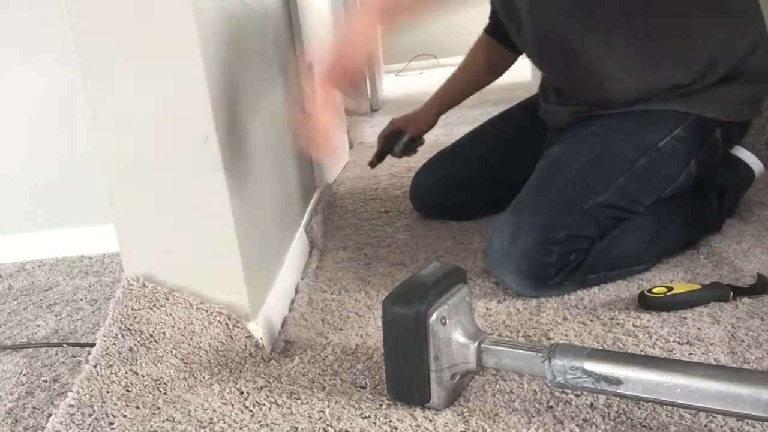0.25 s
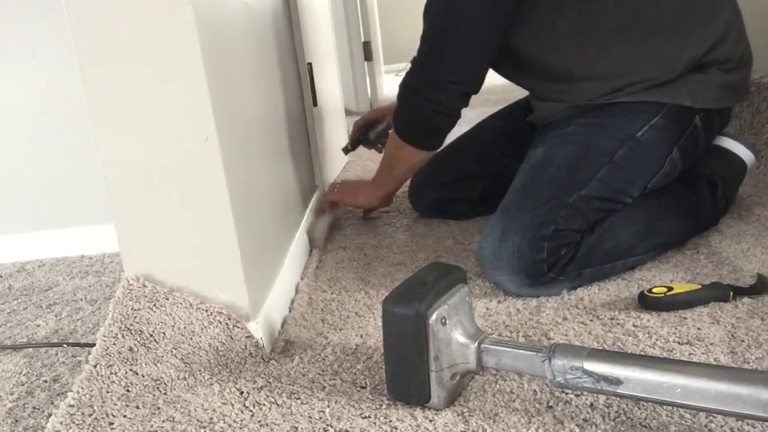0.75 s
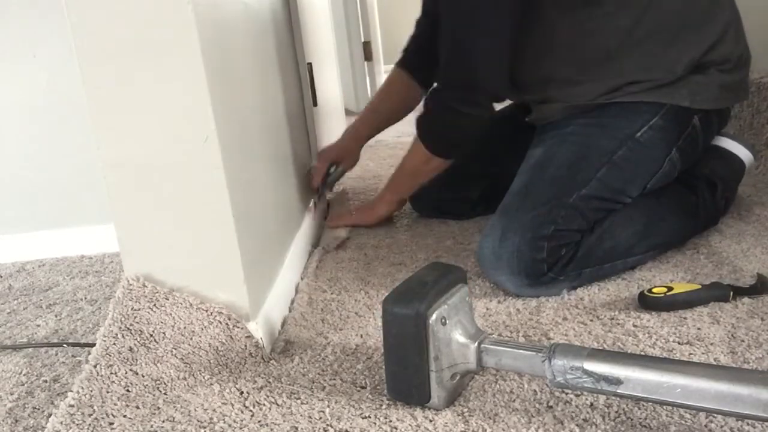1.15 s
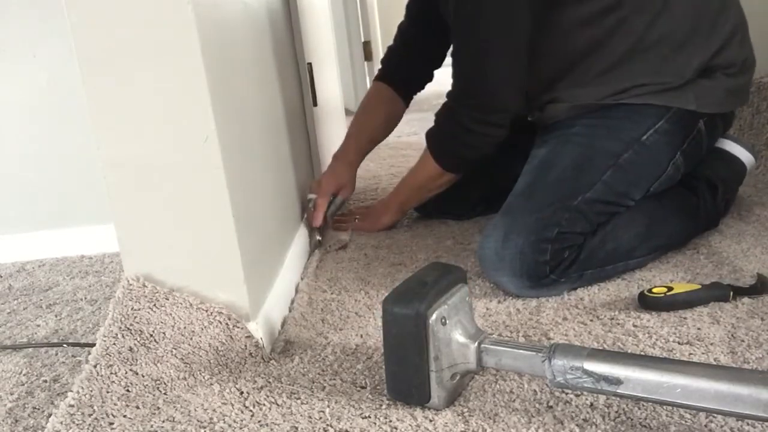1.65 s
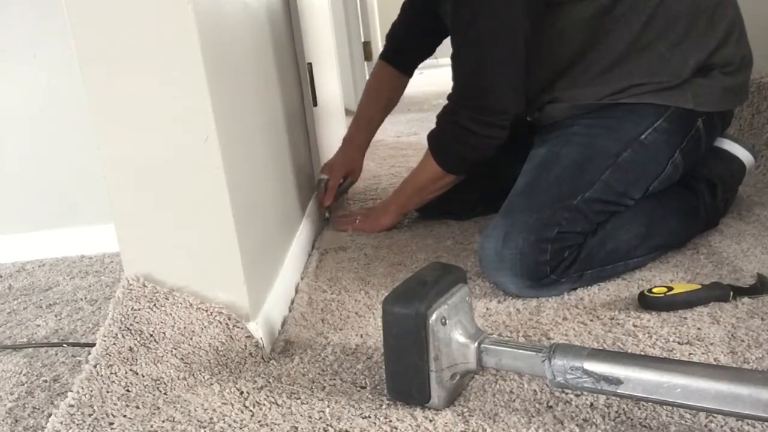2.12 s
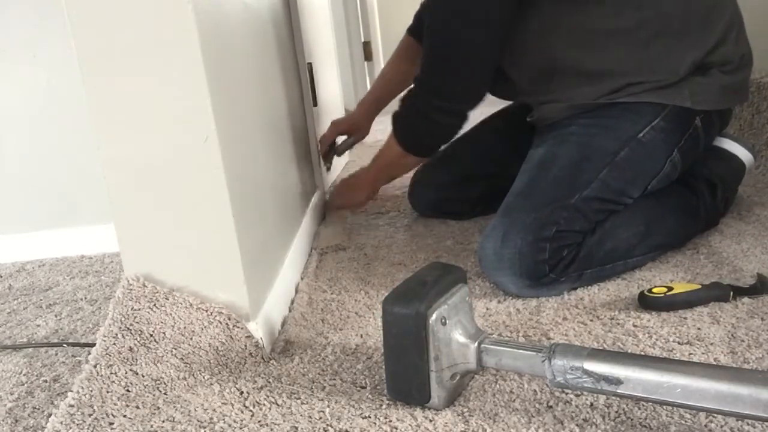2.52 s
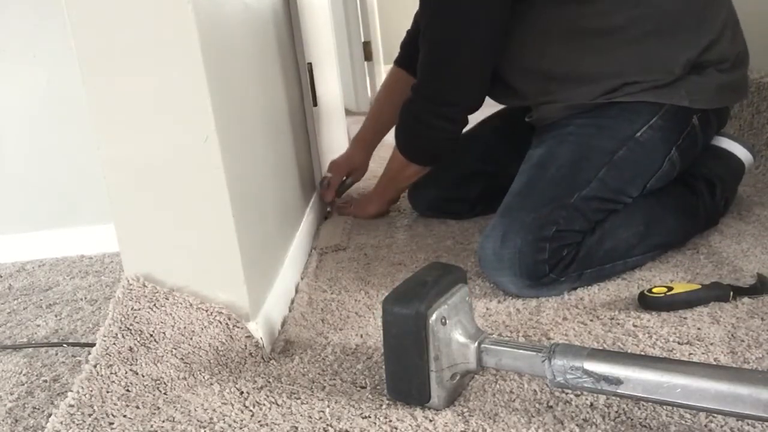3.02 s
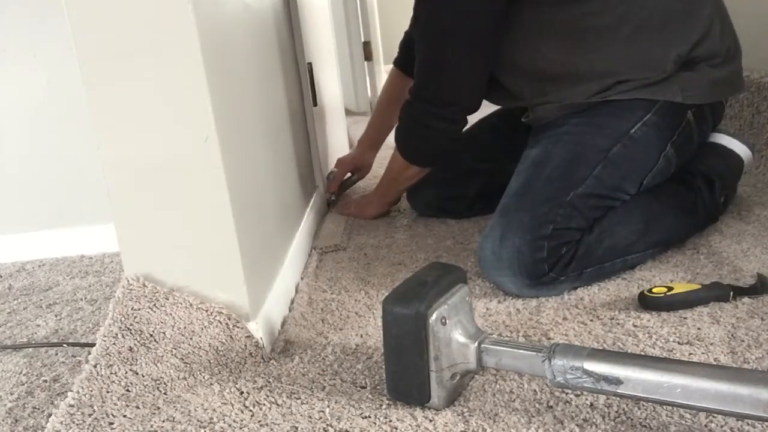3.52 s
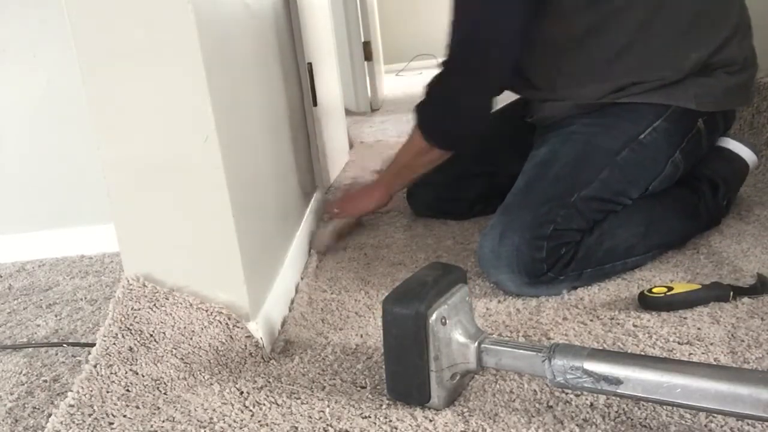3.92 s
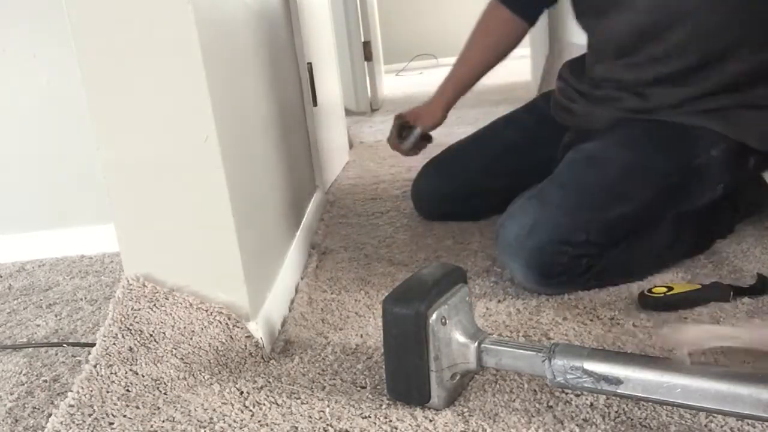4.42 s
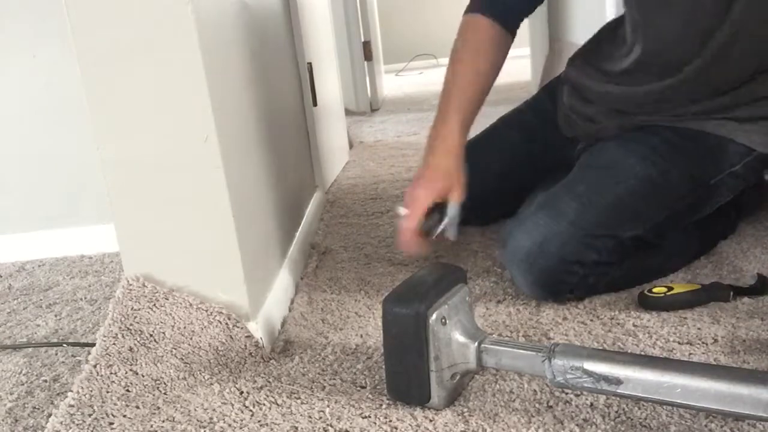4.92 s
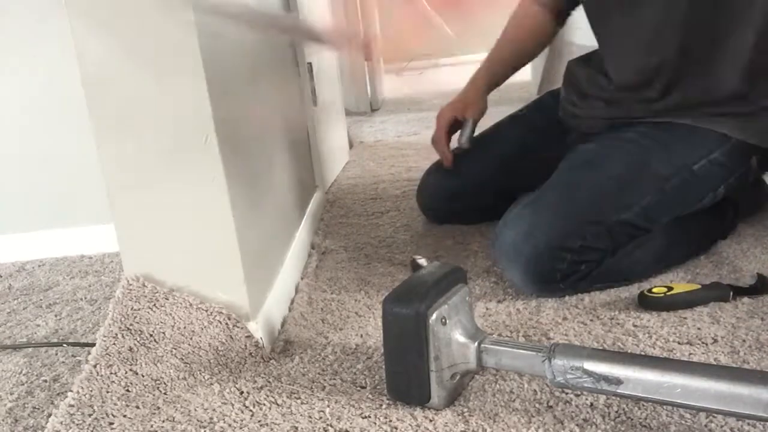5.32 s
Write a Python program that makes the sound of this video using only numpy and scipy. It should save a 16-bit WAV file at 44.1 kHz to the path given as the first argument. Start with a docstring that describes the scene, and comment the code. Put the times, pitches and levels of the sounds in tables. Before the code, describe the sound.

Two harsh, crackling bursts of a blade ripping through stiff carpet backing, amid soft hand rubs, tool ticks and low machine hum indoors.

```python
"""Bare room, carpet along a baseboard: a kneeling worker tucks it in, over a machine humming through the house.
Twice a blade is drawn through the stiff backing: clicks of parting threads, loud snaps, scraped pile, rung board.
Hands and sleeves brush the pile (shaped noise), with squeaks and thin swishes (narrow wavering bands).
The tool ticks on the trim, hands thump the floor, a small hard piece drops and bounces (struck resonances).
The machine is wavering tones, rumble and hiss; the room is a short noise tail."""
import sys
import numpy as np
from scipy import signal
from scipy.fft import rfft, irfft, next_fast_len
from scipy.io import wavfile
from scipy.ndimage import uniform_filter1d, map_coordinates

SR = 44100
rng = np.random.default_rng(int(sys.argv[2]) if len(sys.argv) > 2 else 0)


def int16_out(signal):
    """Quantize to a 16-bit WAV file."""
    q = np.round(np.clip(np.atleast_2d(signal).T, -1, 1) * 32767)
    wavfile.write(sys.argv[1], SR, q.astype(np.int16))


N = 244752

# blade catches and jerks free: time_s, size_db
SNAPS = [(1.936, -15), (1.947, -10), (1.979, -13), (2.058, -10), (2.126, -9), (2.152, -10.5), (2.1906, -6),
         (2.1973, -6), (2.263, -11.5), (2.2752, -19), (2.2853, -23), (3.141, -30), (3.1506, -8),
         (3.163, -11), (3.201, -12.5), (3.233, -11), (3.3039, -12.5), (3.344, -17), (3.3584, -12),
         (3.3733, -9.5), (3.376, -14), (3.395, -30), (3.4044, -11), (3.414, -16), (3.4213, -11),
         (3.489, -15), (3.516, -15.5), (3.549, -11.5), (3.562, -10), (3.5677, -14.5), (3.5798, -11.5),
         (3.594, -8), (3.604, -7.5), (3.6124, -15), (3.636, -15), (3.6883, -12), (3.6946, -7.5),
         (3.732, -21)]
# hiss of fibres, also the tool's edge: freq_hz, gain_db
FIBRES = [(2500, -2), (5000, 0), (6800, 1.5), (9500, -4), (12500, -2), (16000, -11)]


def amp(db):
    """Decibels to amplitude."""
    return 10 ** (np.asarray(db) / 20)


def unit(x):
    """Scale to rms 1."""
    return x / np.sqrt(np.mean(x ** 2) + 1e-20)


def along(points, hz):
    """Interpolate (Hz, value) points on a log frequency axis."""
    f, v = np.transpose(points)
    return np.interp(np.log(hz + 1), np.log(f + 1), v)


def curves(rows):
    """One value per sample for each column after the time; -140 outside the rows."""
    s, *cols = np.transpose(rows)
    t = np.arange(N) / SR
    return [np.interp(t, s, c, left=-140, right=-140) for c in cols]


def wobble(rate, size=N):
    """Smooth random curve, rate knots per second."""
    knots = rng.standard_normal(int(size * rate / SR) + 4)
    return map_coordinates(knots, [np.arange(size) * rate / SR])


def gains(points, hz):
    """Gain of a (Hz, dB) spectrum that falls steeply beyond its ends."""
    below = np.minimum(1, (hz + 1) / points[0][0])
    above = np.minimum(1, points[-1][0] / (hz + 1))
    return amp(along(points, hz)) * (below * above) ** 4


def tilted(points, db_per_octave):
    """The same spectrum, brighter or duller."""
    return [(hz, db + db_per_octave * np.log2(hz / points[0][0])) for hz, db in points]


def noise(points):
    """Coloured noise of rms 1."""
    m = next_fast_len(N)
    white = rfft(rng.standard_normal(m))
    return unit(irfft(white * gains(points, np.fft.rfftfreq(m, 1 / SR)), m)[:N])


def pulse(points, size=2048):
    """Minimum-phase click with this spectrum, of energy 1."""
    cepstrum = irfft(np.log(gains(points, np.fft.rfftfreq(size, 1 / SR)) + 1e-5))
    cepstrum[1:size // 2] *= 2
    cepstrum[size // 2 + 1:] = 0
    h = irfft(np.exp(rfft(cepstrum)))
    return h / np.linalg.norm(h)


def body(modes, size=8192):
    """Impulse response of (Hz, width Hz, dB) resonances in alternating sign, of energy 1."""
    f = np.fft.rfftfreq(size, 1 / SR)
    response = 0
    for k, (centre, width, db) in enumerate(modes):
        damping = 1j * f * width
        response = response + (-1) ** k * amp(db) * damping / (centre ** 2 - f * f + damping)
    h = irfft(response)
    return h / np.linalg.norm(h)


def through(x, h):
    """Filter x by impulse response h."""
    return signal.fftconvolve(x, h)[:N]


def add(track, s, sound):
    """Mix a sound into a track at time s."""
    part = track[round(s * SR):][:len(sound)]
    part += sound[:len(part)]


def burst(t60, rise=0.00027):
    """Noise that swells at once (rise, s) and falls 60 dB in t60 s."""
    t = np.arange(SR // 8) / SR
    return amp(-60 * t / t60) * (1 - np.exp(-t / rise)) * rng.standard_normal(len(t))


def patchy(x, depth_db, size=256):
    """The colour of a sound shifts at random from moment to moment."""
    z = signal.stft(x, nperseg=size)[2]
    field = uniform_filter1d(rng.standard_normal(z.shape), size=4, axis=0)
    field = uniform_filter1d(field, size=8, axis=1)
    return signal.istft(z * amp(depth_db * unit(field)), nperseg=size)[1][:N]


def machine():
    """A motor's wavering hum, the lumpy rumble of moving air and a thin hiss."""
    # motor tones: freq_hz, level_db
    hum_tones = [(122.5, -50.5), (393, -72.5)]
    # moving air: freq_hz, gain_db
    rumble_colour = [(20, -45), (33, -28), (45, -15), (60, -11), (78, 3), (93, 4.5), (108, -1.5),
                     (122, 1.5), (138, 4.5), (165, -8.5), (195, -6.5), (270, -10), (295, -12.5),
                     (345, -9.5), (395, -12), (420, -19.5), (470, -14), (525, -24), (680, -47.5)]
    # thin hiss: freq_hz, gain_db
    air_colour = [(350, -34), (620, -6), (770, -3.5), (900, -7.5), (1010, -3.5), (1720, -13), (2290, -12),
                  (2820, -17.5), (3410, -13.5), (3700, -18), (5900, -18.5), (11400, -25.5), (15800, -26.5)]
    t = np.arange(N) / SR
    hum = np.zeros(N)
    for hz, db in hum_tones:
        level = amp(db + 4.66 * wobble(14)) * np.sqrt(2)
        hum += level * np.sin(2 * np.pi * hz * t + 0.62 * wobble(9))
    lumps = unit(patchy(noise(rumble_colour), depth_db=1.5, size=1024))
    rumble = amp(-44.5 + 1.27 * wobble(10)) * lumps
    return hum + rumble + amp(-67.5) * noise(air_colour)


def thumps():
    """The hand lands on the padded floor with a short low thud."""
    # landings: time_s, level_db
    landings = [(0.051, -34.5), (0.075, -47), (1.852, -39)]
    # thud spectrum: freq_hz, gain_db
    thud_colour = [(120, -3.5), (300, 4.5), (550, -28), (850, -4), (1200, -47), (2500, -21)]
    blows = np.zeros(N)
    for s, db in landings:
        add(blows, s, amp(db) * burst(0.032, rise=0.00088))
    return through(blows, pulse(thud_colour))


def ticks():
    """Each contact knocks the trim, rings the tool and clicks on its edge."""
    # tool contacts: time_s, level_db, hardness_db (more edge, less knock)
    contacts = [(0.054, -56.5, -3), (0.091, -54.5, 7.5), (0.139, -65, 9), (0.883, -55.5, -2.5),
                (0.922, -61.5, 2), (1.045, -51.5, -6), (1.051, -56, 1), (1.854, -43, 2.5),
                (2.835, -73.5, 12.5), (3.026, -71, 12), (3.039, -74, 16), (3.057, -66.5, 13),
                (3.095, -65.5, 10), (4.017, -61, -2), (4.094, -52, -2), (4.105, -39.5, 4),
                (4.117, -39, 0.5), (4.123, -44.5, 6), (4.424, -54.5, 4.5)]
    # tool resonances: freq_hz, width_hz, gain_db
    tool_modes = [(685, 42, -7), (1360, 84, -2.5), (1860, 260, 5), (3020, 660, 2), (3230, 115, 6.5),
                  (3670, 410, -5.5), (4470, 49, 3.5), (5600, 520, -7)]
    knock, click, edge = np.zeros((3, N))
    for s, db, hard_db in contacts:
        add(knock, s, amp(db - hard_db + 0.5) * burst(0.046))
        add(click, s, amp([db + 16.5]))  # one-sample blow
        add(click, s, amp(db + 4.5) * burst(0.029))
        add(edge, s, amp(db + hard_db + 8) * burst(0.011, rise=0.00096))
    trim = pulse([(450, -2.5), (800, 1.0), (1300, 4.0), (2100, -0.5), (2700, -9)])
    return through(knock, trim) + through(click, body(tool_modes)) + through(edge, pulse(FIBRES))


def sweep(length_s):
    """Loudness of one sweep: an arch that follows the speed of the hand."""
    peak_share, power = 0.42, 1.88
    u = np.interp(np.linspace(0, 1, round(length_s * SR)), [0, peak_share, 1], [0, .5, 1])
    return np.abs(np.sin(np.pi * u)) ** power


def brushing():
    """Skin and cloth slide unevenly over pile: a soft rub that brightens with speed, a grainy fibre hiss."""
    # hand or sleeve over the pile: start_s, length_s, rub_db, rub_centre_hz, hiss_db
    sweeps = [(0.056, 0.052, -53.5, 1720, -55.5), (0.657, 0.057, -65.5, 1500, -62),
              (0.868, 0.12, -72, 1600, -64), (1.0, 0.19, -59.5, 1740, -74), (1.091, 0.26, -61.5, 1610, -77),
              (1.241, 0.11, -78, 1700, -51.5), (1.335, 0.082, -72, 1900, -52.5),
              (1.643, 0.062, -62, 1610, -63), (2.377, 0.3, -53.5, 1880, -46.5),
              (2.639, 0.085, -77, 1490, -60.5), (2.672, 0.078, -62, 1300, -71),
              (2.995, 0.32, -74, 1300, -63), (3.828, 0.11, -53, 1870, -49), (3.875, 0.14, -53.5, 1340, -54),
              (3.955, 0.21, -58, 1330, -63.5), (4.29, 0.089, -63, 2070, -67),
              (4.339, 0.11, -65.5, 2500, -71), (4.511, 0.056, -59, 1410, -65),
              (4.566, 0.23, -60.5, 855, -73), (4.717, 0.044, -62, 2840, -82),
              (4.722, 0.16, -65.5, 1220, -70), (5.109, 0.13, -62, 1420, -60),
              (5.292, 0.061, -60, 2210, -59)]
    # rub spectrum, before shifting to each sweep's centre: freq_hz, gain_db
    rub_colour = [(400, -39.5), (800, 4.5), (1600, 8.5), (2400, 2.5), (3600, 0), (5500, -10), (10000, -24)]
    table_centre_hz, slow_duller_octaves = 1600, 0.25
    rub, hiss = np.zeros((2, N))
    for s, length_s, rub_db, centre_hz, hiss_db in sweeps:
        arch = sweep(length_s)
        # crossfade from the duller slow colour to the fast one
        for share, octaves in ((1 - arch, -slow_duller_octaves), (arch, 0)):
            shift = centre_hz / table_centre_hz * 2 ** octaves
            colour = pulse([(hz * shift, db) for hz, db in rub_colour])
            friction = arch * np.sqrt(share) * rng.standard_normal(len(arch))
            add(rub, s, amp(rub_db) * signal.fftconvolve(friction, colour))
        add(hiss, s, amp(hiss_db) * arch)
    grain = unit(amp(1.1 * wobble(700) + 1.2 * wobble(60)))
    rubbing = amp(-2) * patchy(rub, depth_db=4)
    hissing = amp(-5.5) * hiss * noise(FIBRES)
    return grain * (rubbing + hissing)


def squeaks_and_swishes():
    """Squeaks and thin swishes: hoarse narrow noise bands or wavering tones that swell and fade."""
    # squeaks and swishes: start_s, length_s, pitch_hz, glide_octaves, level_db, width_share_of_pitch
    bands = [(0.068, 0.032, 1460, 0.094, -61, 0.12), (0.077, 0.019, 5580, 0.17, -53, 0.2),
             (1.26, 0.079, 14000, 0, -56, 0.39), (1.332, 0.053, 7500, -0.033, -61, 0.25),
             (2.176, 0.021, 4170, 0.042, -33, 0.12), (2.356, 0.014, 1199, 0.062, -55, 0.18),
             (2.64, 0.05, 14200, 0, -63, 0.33), (3.189, 0.14, 4630, -0.39, -46.5, 0.13),
             (4.305, 0.0435, 2370, -0.195, -59, 0.32), (4.416, 0.038, 7820, 0.032, -59.5, 0.11),
             (5.189, 0.012, 2990, -0.016, -59, 0.14), (5.309, 0.016, 3900, -0.04, -60, 0.098),
             (5.369, 0.18, 3410, 0, -72.5, 0.031)]
    out = np.zeros(N)
    for s, length_s, hz, glide, db, width in bands:
        u = np.linspace(0, 1, round(length_s * SR))
        phase = 2 * np.pi * np.cumsum(hz * 2 ** (glide * u)) / SR
        a, b = (wobble(width * hz, size=len(u)) for _ in range(2))
        band = a * np.cos(phase) + b * np.sin(phase)
        add(out, s, amp(db) * np.sin(np.pi * u) * band)
    return out


def leaning():
    """Shifting weight excites the floor's low resonances with noise."""
    # weight on the floor: time_s, level_db
    weight = [(1.72, -76), (1.8, -43), (1.87, -38.5), (1.93, -44.5), (2.2, -57), (2.32, -67)]
    # floor resonances: freq_hz, width_hz, gain_db
    floor_modes = [(45.3, 18, -14), (100.5, 40.6, -1), (147, 50, -3.5), (183.4, 14.7, -0.5)]
    return through(amp(curves(weight)[0]) * rng.standard_normal(N), body(floor_modes))


def threads(times, sizes, size=256):
    """Each thread parts with a sharp noise crack; its fibres fray for a millisecond after it."""
    crack_rise_s, crack_s, fray_share, fray_s = 0.0002, 0.00028, 0.25, 0.001
    t = np.arange(size) / SR
    dying = np.exp(-t / crack_s) + fray_share * np.exp(-t / fray_s)
    envelope = (1 - np.exp(-t / crack_rise_s)) * dying
    shapes = envelope * rng.standard_normal((len(times), size))
    shapes *= (sizes / np.linalg.norm(shapes, axis=1))[:, None]
    at = np.round(np.asarray(times) * SR).astype(int)[:, None] + np.arange(size)
    return np.bincount(at.ravel(), shapes.ravel(), N + size)[:N]


def stroke(rows, colour, crack_db, fibre_db, scrape_db):
    """The blade cuts woven threads in turn; loose fibres crackle between them, its side scrapes the pile."""
    weave_uneven, thread_spread_db = 0.27, 7  # log scatter of spacing, range of strength
    catch_s, fibres_per_s = 0.004, 1100  # no other thread parts this close to a snap
    level_db, threads_per_s = curves(rows)
    crossed = np.cumsum(np.maximum(threads_per_s, 0)) / SR
    steps = np.cumsum(np.exp(weave_uneven * rng.standard_normal(300)))
    at = np.searchsorted(crossed, steps[steps < crossed[-1]])
    to_snap_s = np.abs(at[:, None] / SR - np.array(SNAPS)[:, 0]).min(axis=1)
    at = at[to_snap_s > catch_s]
    sizes = amp(level_db[at] + crack_db - thread_spread_db * rng.random(len(at)))
    cracks = through(threads(at / SR, sizes), pulse(tilted(colour, db_per_octave=.4)))
    rasp = patchy(cracks, depth_db=2.5, size=512)
    loose = rng.standard_normal(N) * (rng.random(N) < fibres_per_s / SR)
    crackle = through(unit(loose), pulse(tilted(colour, db_per_octave=-1.2)))
    scrape = patchy(noise(tilted(colour, db_per_octave=-1.0)), depth_db=3)
    pile = unit(scrape * amp(2.1 * wobble(500)))
    return rasp + amp(level_db + fibre_db) * crackle + amp(level_db + scrape_db) * pile


def snaps():
    """Tough threads hold the blade and then snap loudly."""
    # snap spectrum: freq_hz, gain_db
    snap_colour = [(300, -8), (650, -8), (1000, -1), (2300, 0), (4400, -1), (4950, -4), (5600, 0),
                   (7000, -1), (8600, -4), (9800, 0), (10500, -6), (12500, -2), (16000, -5)]
    s, size_db = np.transpose(SNAPS)
    return through(threads(s, amp(size_db)), pulse(snap_colour))


def lower_board(fast_push, slow_push):
    """The push of the blade rings the baseboard's low resonances, more in the fast stroke."""
    # low baseboard resonances: freq_hz, width_hz, gain_db
    lower_board_modes = [(188, 31, -4), (340.3, 10.4, 1), (410.4, 15.6, 1.5), (524, 25, -2.5),
                         (700, 230, -12.5)]
    push = amp(-13.0) * fast_push + amp(-19.0) * slow_push
    return through(push * rng.standard_normal(N), body(lower_board_modes))


def upper_board(fast_push, slow_push):
    """The baseboard's resonances near 1 kHz ring, weighted towards the slow stroke."""
    # baseboard resonances near 1 kHz: freq_hz, width_hz, gain_db
    upper_board_modes = [(927, 49, 0.5), (1022, 92, -0.5)]
    push = amp(-19.5) * fast_push + amp(-11.5) * slow_push
    return through(push * rng.standard_normal(N), body(upper_board_modes))


def tucking():
    """Two strokes and their snaps, with the baseboard and floor they sound."""
    # blade strokes: time_s, level_db, threads_per_s
    fast_rows = [(1.866, -48.5, 40.5), (1.924, -46.5, 90.5), (1.95, -36.5, 149.5), (2.02, -33, 199.5),
                 (2.06, -32, 215), (2.178, -32, 215), (2.19, -31, 240), (2.236, -32.5, 220.5),
                 (2.26, -47.5, 86.5), (2.29, -46, 9), (2.33, -62, 0.5)]
    slow_rows = [(3.13, -60, 0), (3.15, -35.5, 139.5), (3.186, -39, 160.5), (3.2, -36, 190),
                 (3.24, -35, 190), (3.278, -42.5, 130.5), (3.316, -37, 134.5), (3.44, -43.5, 100),
                 (3.49, -39, 125.5), (3.53, -48, 99.5), (3.556, -36, 150.5), (3.6, -41, 110.5),
                 (3.648, -49, 109), (3.692, -30, 159), (3.71, -44.5, 69), (3.745, -49, 10),
                 (3.79, -56, 0.5)]
    # crackle spectra: freq_hz, gain_db
    fast_colour = [(250, -18), (400, -17), (720, -14.5), (950, -4), (1400, -7.5), (1900, -5), (3100, -4),
                   (3900, -6.5), (4350, -2.5), (4950, -9), (5500, -2.5), (6100, -5), (7200, -5),
                   (8600, -12), (9900, -4.5), (10400, -11), (12800, -9), (15800, -13)]
    slow_colour = [(290, -22), (550, -15), (780, -4), (1020, 1), (1400, -1.5), (2200, 0.5), (3300, -0.5),
                   (4400, -2), (4950, -7), (5500, -4), (6500, -1.5), (7300, -6), (8600, -7), (9700, -1.5),
                   (10500, -11), (12100, -5.5), (15800, -10)]
    fast = stroke(fast_rows, fast_colour, crack_db=24, fibre_db=-8, scrape_db=-9)
    slow = stroke(slow_rows, slow_colour, crack_db=26, fibre_db=-8, scrape_db=-9)
    pushes = amp(curves(fast_rows)[0]), amp(curves(slow_rows)[0])
    return fast + slow + snaps() + lower_board(*pushes) + upper_board(*pushes) + leaning()


def dropped_piece():
    """A short dull landing, then quick ringing, scuffing bounces; long contacts ring only low modes."""
    # bounces: time_s, ring_db, thud_db, contact_ms
    bounces = [(5.061, -56, -40, 0.75), (5.069, -37, -60, 0.079), (5.079, -32, -38.5, 0.6),
               (5.088, -35.5, -46, 0.12), (5.102, -36.5, -60, 0.17), (5.119, -42, -54, 0.75),
               (5.14, -51, -60, 0.5), (5.157, -57, -60, 0.2), (5.254, -54, -57, 0.25)]
    # resonances of the piece: freq_hz, width_hz, gain_db
    piece_modes = [(1188, 45, 5.5), (1293, 28, 7), (1398, 44, 1.5), (1640, 160, -9), (2060, 370, -11),
                   (2750, 160, -5), (2970, 88, -2), (3200, 160, -8.5), (3870, 130, -10.5),
                   (6000, 3300, -25)]
    clank, thud = np.zeros((2, N))
    for s, ring_db, thud_db, contact_ms in bounces:
        press = np.hanning(3 + round(contact_ms * SR / 1000))
        strike = amp(ring_db) * burst(0.054, rise=0.0002)  # scuff
        strike[0] += amp(ring_db + 21)  # blow
        add(clank, s, np.convolve(strike, press / press.sum()))
        add(thud, s, amp([thud_db + 20]))
        add(thud, s, amp(thud_db + 6) * burst(0.03))
    floor = pulse([(130, 6), (240, 9.5), (450, 2), (850, -5), (1100, -1)])
    return through(clank, body(piece_modes)) + through(thud, floor)


def room(x):
    """Bare walls answer after 3 ms with a noise tail whose decay depends on frequency."""
    # decay: freq_hz, t60_s
    decay = [(150, 0.14), (500, 0.024), (1300, 0.31), (3500, 0.32), (9000, 0.1), (15000, 0.12)]
    hz, t, z = signal.stft(rng.standard_normal(SR // 2), SR, nperseg=256)
    fading = amp(-60 * t / along(decay, hz)[:, None])
    tail = signal.istft(z * fading, SR, nperseg=256)[1]
    return through(x, np.pad(tail / np.linalg.norm(tail), (round(.003 * SR), 0)))


def scene():
    """Mix the sources with their room answers; the machine stays dry."""
    taps, hands = ticks() + thumps(), brushing()
    carpet, drop = tucking() + squeaks_and_swishes(), dropped_piece()
    wet = room(amp(-10.0) * carpet + amp(-7.5) * taps + amp(-12.5) * drop + amp(-10.5) * hands)
    return (carpet + taps + drop + hands + wet + machine())[None]


def record(dry):
    """The recorder keeps nothing above its band limit."""
    top_hz = 15850
    m = next_fast_len(N + SR // 4)
    passed = np.fft.rfftfreq(m, 1 / SR) < top_hz
    return irfft(rfft(dry, m) * passed, m)[..., :N]


dry = scene()
out = record(dry)
int16_out(out)
```